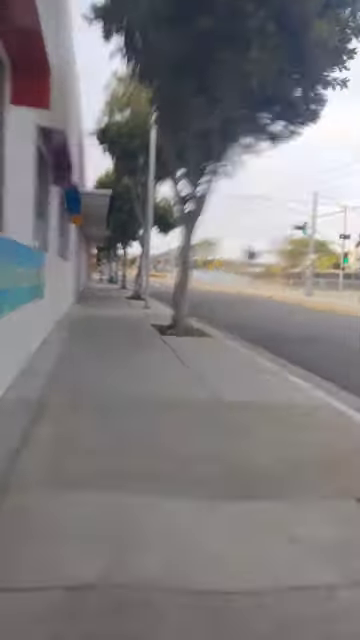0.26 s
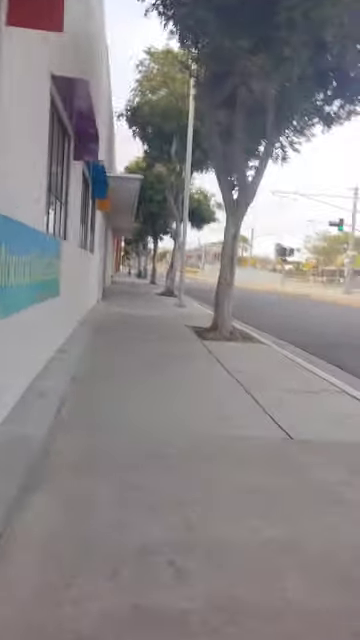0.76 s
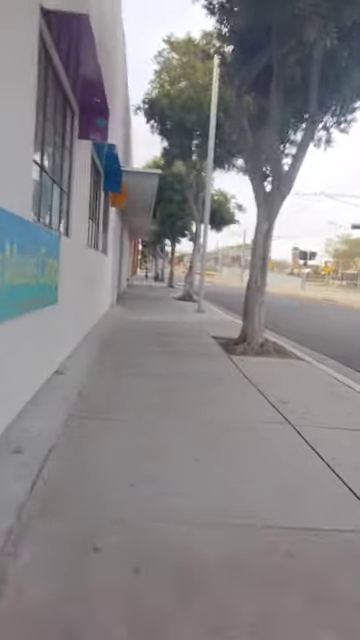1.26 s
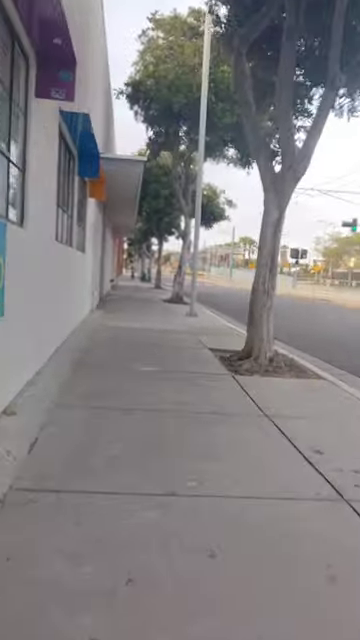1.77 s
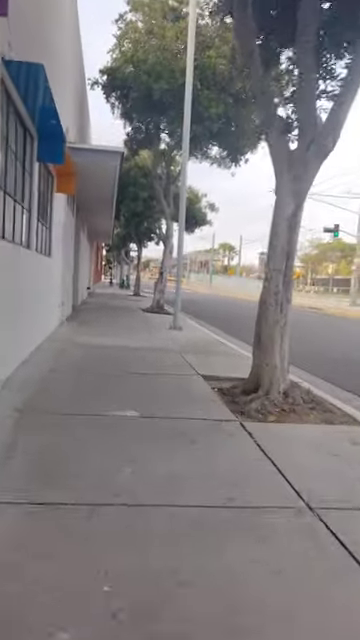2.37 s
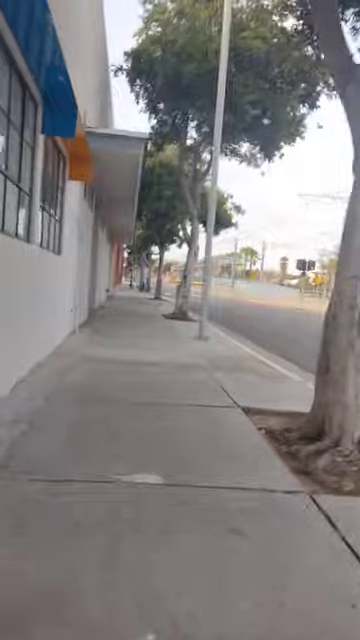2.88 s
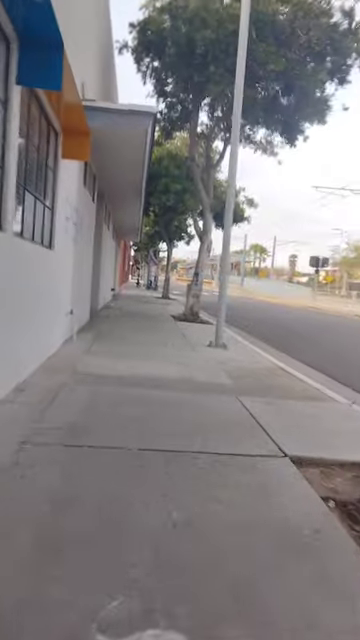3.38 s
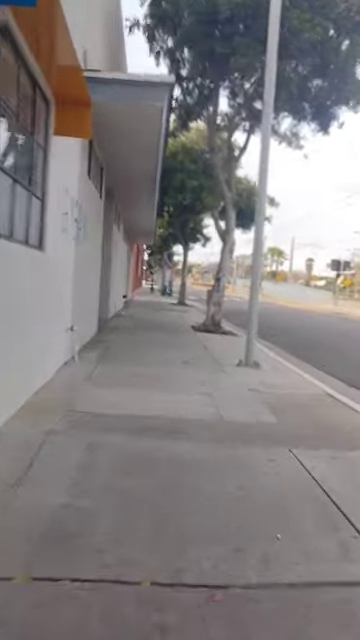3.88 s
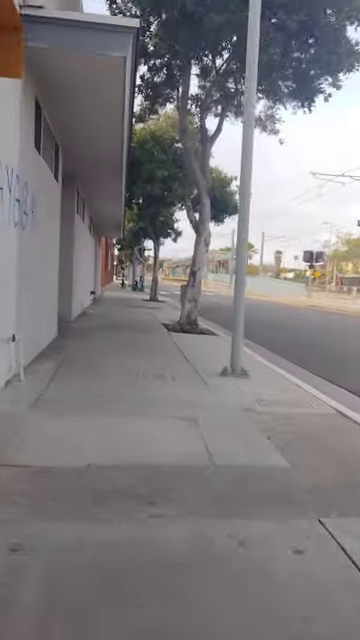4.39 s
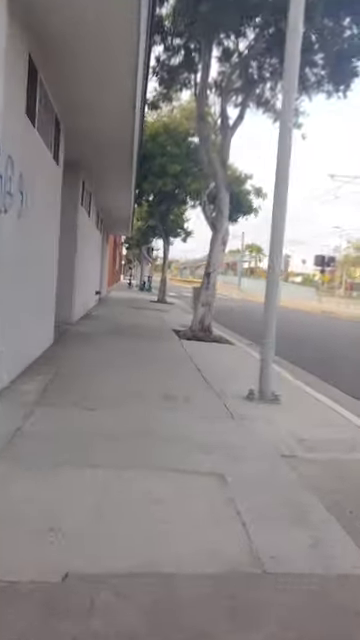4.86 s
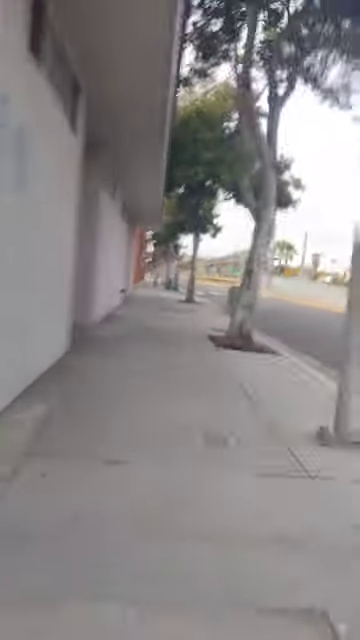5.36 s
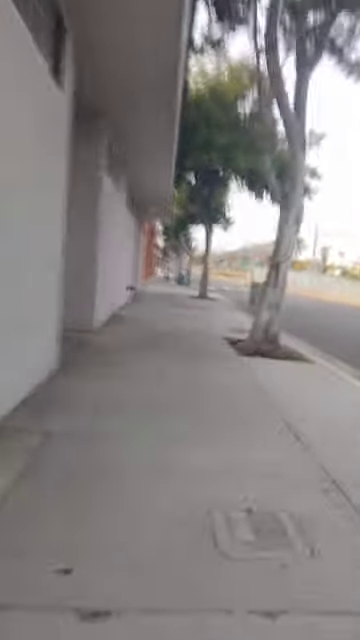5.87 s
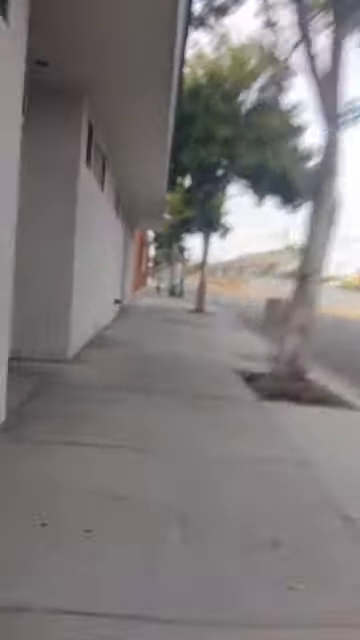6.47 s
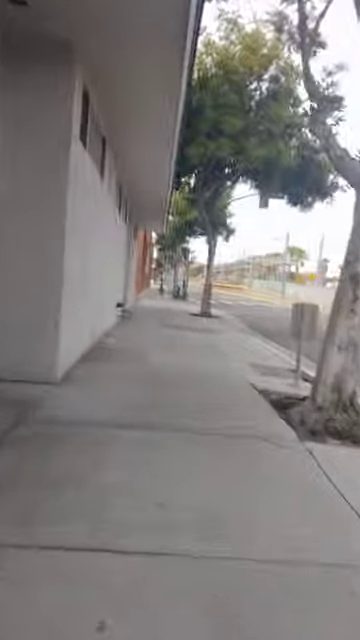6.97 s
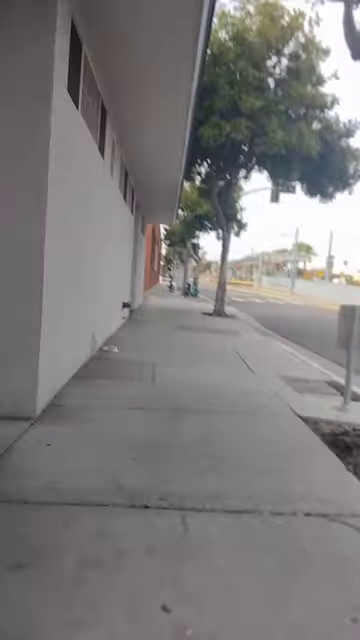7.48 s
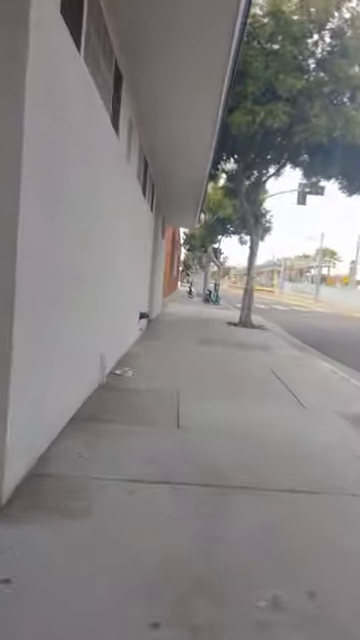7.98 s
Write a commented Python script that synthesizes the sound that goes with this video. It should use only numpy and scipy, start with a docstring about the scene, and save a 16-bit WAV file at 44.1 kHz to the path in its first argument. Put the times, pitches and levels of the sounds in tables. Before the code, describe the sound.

A stereo microphone rides on a bicycle along a concrete sidewalk beside a wall. Low tyre rumble, soft gritty hiss and slight wind run throughout. Hard casing cracks, a snap and a thump hit at 0.25 seconds, then a bright squeak at 0.3. Thin squeaks near 5.5 kilohertz repeat roughly every 0.8 seconds, leaning left, varying in strength. Buzzing clacks and scuffs come at 0.65-0.9, and the heaviest wheel thud crunches over a joint at 1.15. A hollow knock sounds at 2.2; the stretch afterward is calmer, with a clack at 3.4 and rattles and a dry tick around 4.3-4.6. Jolts and cracks cluster at 5.4-5.8. At 6.05-6.3 tyres scrub and scrape with another sharp jolt and lighter joint bump. Rattles follow, strongest at 7.36, with small bumps at 7.05 and 8.0. Faint smeared bird whistles appear near 1, 4.5, 6 and 7.6-8.2.

```python
"""Tyres rumble and hiss on concrete beside a wall: a bicycle rolls past it, the microphone riding along.
Close by, loose parts rattle, clack and scuff, and wheel and frame thud over joints: noise bursts through modes.
A dry bearing squeaks once a turn of the pedals, and chirps and scrubs glide between: wavering sines.
Wind, low thumps and jolts reach the microphone (coloured noise, swaying ports, ringing casing and mount).
Far birds are gliding whistles smeared by the street; weak echoes follow the bicycle's own close noises."""
import sys
import numpy as np
from scipy import signal
from scipy.fft import rfft, irfft
from scipy.io import wavfile

SR = 44100
rng = np.random.default_rng(int(sys.argv[2]) if len(sys.argv) > 2 else 0)


def int16_out(signal):
    """Quantize to a 16-bit WAV file."""
    q = np.round(np.clip(np.atleast_2d(signal).T, -1, 1) * 32767)
    wavfile.write(sys.argv[1], SR, q.astype(np.int16))


N = 363384

# Rolling: (time [s], tyre rumble [dB], hiss [dB])
ROLLING_LEVELS = [(0.0, -40, -46.5), (0.32, -37.5, -47), (4.15, -37.5, -51), (5.03, -37.5, -51),
                  (6.17, -36, -47.5), (6.35, -34.5, -47), (6.75, -39.5, -48), (7.14, -37, -49),
                  (8.24, -37, -48)]
# Spectra of tyre rumble, hiss, low air noise, scuffs and joint crunch: (frequency [Hz], density [dB per Hz])
TYRE_SPECTRUM = [(29, -38), (50, -4), (119, 0), (140, -6), (168, -3), (274, -10.5), (345, -10),
                 (393, -15.5), (519, -17), (564, -17.5), (1140, -24), (1360, -29), (1740, -34.5),
                 (2500, -34), (3250, -48), (5500, -120)]
HISS_SPECTRUM = [(500, 2), (1100, 4.5), (1600, 4), (2100, -0.3), (3200, 0.5), (4500, -3.5), (5500, -5.5),
                 (7000, -5.5), (8200, -17.5), (11500, -18.5), (13000, -13.5), (15700, -9), (16400, -45)]
LOW_AIR_SPECTRUM = [(12, -16), (25, -12), (42, 2), (65, -2), (110, -10), (300, -31), (900, -53)]
SCUFF_SPECTRUM = [(500, -14), (1300, -1), (2000, -1.5), (3200, -0.5), (5500, 3), (7200, -1), (9000, -9),
                  (13000, -2), (16000, -12)]
CRUNCH_SPECTRUM = [(150, 10), (400, 5), (700, -6), (1100, -3.5), (1700, -7), (3000, -12), (5500, -19),
                   (8000, -28.5), (15000, -36)]
# Likeness of the two sides: (frequency [Hz], likeness, limited to -1..1)
STEREO_LIKENESS = [(30, 0.5), (60, 0.74), (130, 1), (290, 1.8), (640, 0.07), (1400, -0.01), (15000, 0)]
# Stereo lean: (frequency [Hz], left minus right [dB])
STEREO_LEAN = [(40, -1), (130, -0.5), (500, -1), (1500, -2.5), (3300, -3.5), (4600, 2), (5700, 14.5),
               (7500, 23), (10000, 8), (15000, 0.5)]
PORT_LAG_S = 0.00031   # tyre sound reaches the left port this much later
# Fine random unevenness of the treble hiss: level against the hiss, its swing, and the most it rises
UNEVEN_DB, UNEVEN_SWING_DB, UNEVEN_TOP_DB = -11, 8, 11.5

# Gusts and low thumps on the microphone, some under jolts and joints: (time [s], level [dB], length [s])
GUSTS_AND_THUMPS = [(0.248, -25, 0.1), (0.66, -31, 0.096), (1.116, -20.5, 0.06), (5.377, -19, 0.091),
                    (5.527, -29, 0.34), (6.076, -24, 0.055), (6.21, -27, 0.062), (6.553, -29, 0.097),
                    (7.04, -24, 0.027), (7.125, -25.5, 0.13)]
WIND_DB = -41   # steady head wind

# Falling chirps between the squeaks: (time [s], length [s], start pitch [Hz], level [dB])
CHIRPS = [(0.053, 0.011, 4460, -30.5), (1.617, 0.027, 4270, -35.5), (1.666, 0.015, 1380, -36),
          (1.896, 0.024, 1660, -41), (2.378, 0.011, 4320, -32.5), (6.989, 0.011, 4290, -41)]
CHIRP_DROP, CHIRP_LEAN_DB = 0.053, 5   # share of the pitch lost; left minus right
# Tyres scrubbing sideways in a swerve: (time [s], length [s], start [Hz], end [Hz], level [dB])
TYRE_SCRUBS = [(6.056, 0.038, 1200, 1305, -43.5), (6.138, 0.04, 1590, 1776, -37),
               (6.189, 0.09, 1666, 992, -40)]
SCRUB_WAVER = 0.106   # share of the pitch

# Bright scuffs close to the microphone: (time [s], level [dB], length [s])
SCUFFS = [(0.213, -32.5, 0.012), (0.292, -29, 0.02), (0.334, -33, 0.045), (0.644, -31, 0.024),
          (0.77, -28, 0.022), (0.796, -27.5, 0.011), (0.856, -28.5, 0.011), (2.749, -42.5, 0.013),
          (3.05, -42.5, 0.025), (3.422, -40, 0.034), (3.461, -37, 0.023), (4.228, -42, 0.017),
          (5.495, -31.5, 0.014), (5.681, -37, 0.016), (5.781, -31, 0.011), (7.046, -36.5, 0.014),
          (7.334, -36.5, 0.018)]
JOINT_SCUFF_DB = -40.5   # every joint brings a faint one

# Loose parts rattling: (time [s], level [dB], left minus right [dB], loss at each bounce [dB])
RATTLES = [(0.2137, -27, -3, 20), (0.55, -27, -10, 2), (1.2907, -27.5, -11, 1), (1.585, -37, -5, 15),
           (2.1074, -33.5, -6, 25), (2.278, -36.5, -10, 7), (3.046, -30, -9, 6), (3.593, -33, -10, 12),
            (4.371, -35, -3, 9), (4.542, -31, -4, 14), (4.5709, -25.5, -8, 19), (5.978, -37.5, -7, 16),
           (6.3118, -32.5, -9, 17), (6.609, -24.5, -8, 15), (6.6746, -27.5, -8, 22), (6.827, -31, -4, 7),
           (7.335, -35, 0, 15), (7.3607, -17, -6, 29), (7.4082, -29.5, -5, 19), (7.568, -36, -8, 0.5),
           (8.126, -23, 1, 16)]
# Modes of the loose fittings: (frequency [Hz], level [dB], t60 [s])
FITTING_MODES = [(1190, -5, 0.016), (1750, -5.5, 0.012), (2370, -6, 0.012), (3030, 0, 0.031),
                 (3366, -0.5, 0.025), (3720, 1, 0.0096), (4190, -7, 0.021), (4576, -2.5, 0.03)]
BOUNCE_S, CHATTER_T60_S = 0.014, 0.042
KNOCK_S, KNOCK_DB = 2.197, -20.5   # one hollow knock, before its lift in the mix
# Modes of the hollow knock: (frequency [Hz], level [dB], t60 [s])
HOLLOW_MODES = [(602, 2, 0.056), (980, -11, .035), (1350, -9, .03), (1870, -11, .04)]

# Tyres over joints: (time [s], thud level [dB], grit level [dB], pitch favoured by the blow [Hz])
JOINTS = [(1.144, -2, -21.5, 185), (6.241, -16.5, -33.5, 260), (7.054, -13, -29, 370),
          (8.001, -15, -28.5, 280)]
# Modes of wheel and frame: (frequency [Hz], level [dB], t60 [s])
FRAME_MODES = [(159, 0, 0.047), (215.6, 3, 0.052), (347, -4.5, 0.052), (480, -1, 0.03), (584, -2, 0.033),
               (742, -6, 0.044), (1110, -6, 0.024)]
# The wheel meets the edge, lands and hops three times: (delay [s], level [dB])
WHEEL_HOPS = [(-0.004, -5), (0.003, 1), (.021, -12), (.033, -6), (.06, -7)]
SHUDDER_T60_S = 0.11
CRUNCH_LEAD_S, CRUNCH_S = 0.0091, 0.032
# Tyres scraping over grit: (time [s], level [dB], length [s])
GRIT_SCRAPES = [(0.246, -22, 0.029), (1.129, -26.5, 0.039), (3.411, -31.5, 0.022), (5.373, -30, 0.029),
                (6.048, -38.5, 0.063), (6.118, -37, 0.074), (6.192, -24.5, 0.035)]

# Bearing squeaks: (time [s], level [dB], length [s], climbing tone [dB], left minus right [dB])
SQUEAKS = [(0.325, -16.5, 0.056, -20, 7), (1.245, -32, 0.042, 6.5, 14), (2.003, -23.5, 0.057, -7, 10),
           (2.774, -41.5, 0.029, 3.5, 12), (3.54, -34, 0.043, 2, 12), (4.313, -30, 0.044, -0.5, 14),
           (5.098, -32, 0.048, -4, 12), (5.865, -24.5, 0.042, -4, 8), (6.484, -28.5, 0.05, -3.5, 13),
           (7.369, -27.5, 0.039, 2.5, 15), (8.141, -35.5, 0.056, 0.5, 12)]
SQUEAK_HZ, CLIMB_FROM_HZ, CLIMB_TO_HZ = 5534, 5520, 5710
SQUEAK_RING_T60_S = 0.25
LEAD_IN_S, LEAD_IN_HZ, LEAD_IN_DB = 0.065, 5340, -51   # a faint whine comes before each squeak
# Faint steady whines around the squeaks: (time [s], length [s], pitch [Hz], level [dB])
WHINES = [(0.423, 0.032, 5440, -44), (0.475, 0.036, 5500, -43.5), (3.43, 0.025, 5470, -41),
          (3.29, 0.055, 5500, -50), (4.184, 0.036, 5450, -51.5), (4.277, 0.018, 10140, -46.5),
          (5.065, 0.067, 4850, -50), (7.435, 0.04, 5500, -45), (7.966, 0.02, 5400, -37),
          (8.028, 0.025, 5530, -43)]
WHINE_LEAN_DB = 19

# Bright snaps of the mount: (time [s], level [dB])
SNAPS = [(0.2604, -25), (0.2638, -15), (5.3858, -22.5), (5.4054, -30), (5.437, -27), (5.495, -25),
         (5.6758, -22), (5.7747, -26), (5.7786, -26), (5.7876, -30), (6.2125, -14), (6.269, -35),
         (7.057, -36), (7.0669, -26), (7.2122, -31)]
SNAP_HOLD_S, SNAP_T60_S = 0.00057, 0.0055
# Colour of the snaps: (frequency [Hz], density [dB per Hz])
SNAP_SPECTRUM = [(1500, -14), (5500, 3), (9500, -2), (15000, 3.5)]

# Jolts of the microphone: (time [s], sway level [dB], knock level [dB])
JOLTS = [(0.261, -5.5, -12), (5.384, -7, -8.5), (5.431, -9, -28), (5.483, -17, -20.5), (5.669, -13, -21),
         (5.773, -14, -24), (6.089, -13.5, -24), (6.208, -5.5, -9.5)]
# Sway at the left, then the right port: (delay [s], frequency [Hz], t60 [s])
PORT_SWAY = [(0.002, 112, 0.043), (0.0045, 68, 0.041)]
# Modes of the knocked mount: (frequency [Hz], level [dB], t60 [s])
MOUNT_MODES = [(165, 2.5, 0.024), (345, -2.5, 0.028), (502, -4.5, 0.038), (1080, -14, 0.02)]
# Hard cracks of the microphone casing: (time [s], peak [dB])
CASING_CRACKS = [(0.2604, -10), (0.2661, -8.5), (5.389, -9.5), (5.4298, -19.5), (5.4857, -21),
                 (5.4924, -21.5), (6.217, -14)]
CRACK_LEAN_DB = -27
# Modes of the casing: (frequency [Hz], level [dB], t60 [s])
CASING_MODES = [(1155, -2.5, 0.014), (1670, 1.5, 0.0081), (2340, -1.5, 0.012), (3000, -3, 0.007),
                (3820, 0.5, 0.0036)]

# Buzzing clacks: (time [s], level [dB], length [s], pitch favoured [Hz], left minus right [dB])
CLACKS = [(0.647, -20.5, 0.0088, 2520, -9), (0.656, -14.5, 0.0075, 3000, -4), (0.79, -25, 0.014, 1100, -14),
          (0.864, -27.5, 0.013, 1100, -7), (3.416, -18.5, 0.0046, 1710, -11),
          (3.426, -22, 0.0094, 2880, -3), (6.166, -29, 0.0078, 1900, 0), (7.993, -21.5, 0.0041, 1300, -1)]
CLACK_FOCUS_DB = 12.5   # loss per octave away from that pitch
# Modes of the bracket that clacks: (frequency [Hz], level [dB], t60 [s])
BRACKET_MODES = [(1310, -3, 0.026), (1800, -9, 0.005), (2170, -0.5, 0.01), (2510, -1.5, 0.011),
                 (2993, -0.5, 0.024), (3635, 1.5, 0.018)]
TICK_S, TICK_DB, TICK_LEAN_DB = 4.3262, -21, 12   # one dry tick on the left
# Modes of the tick: (frequency [Hz], level [dB], t60 [s])
TICK_MODES = [(4060, -2, 0.0085), (4500, 5, 0.0087)]

# Far birds: (time [s], length [s], start pitch [Hz], end pitch [Hz], level [dB])
BIRDS = [(0.997, 0.037, 2950, 3080, -39), (4.5, 0.022, 5100, 3950, -38), (4.591, 0.078, 2745, 2390, -38.5),
         (4.613, 0.057, 4800, 4320, -48), (6.028, 0.063, 3110, 2950, -44), (7.645, 0.035, 2110, 2230, -41),
         (7.691, 0.023, 2520, 2770, -37.5), (7.714, 0.079, 4330, 3310, -38),
         (7.934, 0.046, 4850, 4460, -37), (8.148, 0.088, 4360, 3200, -39.5)]
BIRD_FADE_T60_S, STREET_T60_S = 0.35, 0.19
CUTOFF_HZ = 16500


def from_db(db):
    """Decibels as an amplitude factor."""
    return 10 ** (np.asarray(db) / 20)


def rms_one(x):
    """Scaled to unit power."""
    return x / np.sqrt(np.mean(x ** 2) + 1e-20)


def in_time(rows):
    """Curve columns at every sample."""
    s, *columns = np.transpose(rows)
    return [np.interp(np.arange(N) / SR, s, column) for column in columns]


def at_hz(points, hz):
    """A table read along log frequency."""
    table_hz, values = np.array(points).T
    return np.interp(np.log(hz + 1e-6), np.log(table_hz), values)


def panned(lean_db):
    """Left and right gains of constant power; a positive lean is to the left."""
    gains = np.vstack([from_db(lean_db / 2), from_db(-lean_db / 2)])
    return gains / np.sqrt(np.mean(gains ** 2, axis=0))


def drift(rate, size=N):
    """Straight lines between random knots of spread 1, rate knots for every SR points."""
    knots = rng.standard_normal(int(size / SR * rate) + 3)
    return np.interp(np.arange(size) / SR * rate, np.arange(len(knots)), knots)


def noise(spectrum, lean=0.92, shared=1.0, ripple_db=-4.0):
    """Coloured stereo noise of rms 1, its likeness set by frequency, rippled by nearby surfaces."""
    hz = np.arange(N // 2 + 1) * SR / N
    mid, side = rfft(rng.standard_normal((2, N)))
    alike = np.clip(shared * at_hz(STEREO_LIKENESS, hz), -1, 1)
    pair = np.sqrt(1 + alike) * mid + np.sqrt(1 - alike) * side * [[1], [-1]]
    # The ripple runs along frequency and is full from 2 kHz up.
    ripple = ripple_db * drift(49.65, size=len(hz)) * np.minimum(hz / 2000, 1)
    colour = from_db(at_hz(spectrum, hz) + ripple) * (hz > 10)
    return rms_one(irfft(pair * colour * panned(lean * at_hz(STEREO_LEAN, hz)), N))


def ring(force, modes):
    """Each mode rings as a dying sine; neighbours swing in opposite directions."""
    out = 0
    for k, (hz, db, t60) in enumerate(modes):
        radius = from_db(-60 / (t60 * SR))
        angle = 2 * np.pi * hz / SR
        poles = [1, -2 * radius * np.cos(angle), radius * radius]
        swing = signal.lfilter([0, np.sin(angle)], poles, force + 1e-18)
        out = out + (-1) ** k * from_db(db) * swing
    return out


def add(track, s, sound):
    """Mixes a sound in at time s."""
    start = max(round(s * SR), 0)
    part = sound[..., :max(N - start, 0)]
    track[..., start:start + part.shape[-1]] += part


def burst(rise, hold, t60, size=16000):
    """An envelope that swells, holds and dies away."""
    t = np.arange(size) / SR
    fall = np.exp(-np.log(1000) * np.maximum(t - hold, 0) / t60)
    return (1 - np.exp(-t / rise)) * fall


def rub(length):
    """An envelope that swells and falls away over about the given length."""
    t = np.arange(round(4 * length * SR)) / SR / length
    body = (1 - np.exp(-(4 * t) ** 2)) * np.exp(-t ** 4 / 2)
    return body + 0.2 * t * np.exp(-t ** 2 / 2)


def blow(modes, t60, chatter, swell=0.000075):
    """One contact and its dying chatter of small ones, rung through a body; peak 1."""
    envelope = burst(swell, 0, t60)
    force = chatter * envelope * rng.standard_normal(len(envelope))
    force[0] += 1
    sound = ring(force, modes)
    return sound / np.max(np.abs(sound))


def whistle(start_hz, end_hz, length, waver, t60=0.028, bend=1):
    """A gliding tone, unsteady in pitch and strength, that fades once it is no longer driven."""
    envelope = burst(0.0018, length, t60) * burst(0.0018, length, np.inf)
    size = len(envelope)
    progress = np.minimum(np.arange(size) / SR / length, 1)
    hz = start_hz + (end_hz - start_hz) * progress ** bend
    hz = hz * (1 + waver * drift(497, size=size))
    strength = from_db(3.5 * drift(96.0, size=size))
    return envelope * strength * np.sin(2 * np.pi * np.cumsum(hz) / SR)


def rolling():
    """Tyres rumble and hiss on uneven concrete; grit ticks in loose clusters; the treble hiss is uneven."""
    tyre_db, hiss_db = in_time(ROLLING_LEVELS)
    tyres = from_db(tyre_db + 3.0 + 1.22 * drift(25)) * noise(TYRE_SPECTRUM, ripple_db=3.0)
    tyres[0] = np.interp(np.arange(N) - PORT_LAG_S * SR, np.arange(N), tyres[0])
    hiss_level = from_db(hiss_db + 2.5 + 2.83 * drift(40) + 1.7 * drift(600))
    hiss = hiss_level * noise(HISS_SPECTRUM, ripple_db=2.0)
    # Chance hits around 90 a second on each side, thickening and thinning together.
    hits = rng.random((2, N)) < 90 * from_db(6 * drift(9)) / SR
    grains = hits * np.minimum(rng.exponential(1, (2, N)), 3)
    grit = ring(grains * from_db(hiss_db - 5.0), FITTING_MODES) * panned(-8)
    uneven_swing_db = np.minimum(UNEVEN_SWING_DB * drift(260), UNEVEN_TOP_DB)
    uneven_treble = from_db(hiss_db + UNEVEN_DB + uneven_swing_db) * noise(SCUFF_SPECTRUM)
    return tyres + hiss + grit + uneven_treble


def wind_and_thumps():
    """Air tumbles steadily over the microphone; gusts and low thumps differ almost wholly between ports."""
    swells = np.zeros(N)
    for s, db, length in GUSTS_AND_THUMPS:
        add(swells, s, from_db(db) * rub(length))
    steady = from_db(WIND_DB) * noise(LOW_AIR_SPECTRUM, shared=0.99)
    return steady + swells * noise(LOW_AIR_SPECTRUM, shared=-0.087) * panned(-5)


def chirps():
    """Short thin chirps sag in pitch; the tyres scrub with a rough, gliding note."""
    out = np.zeros((2, N))
    for s, length, hz, db in CHIRPS:
        chirp = whistle(hz, hz * (1 - CHIRP_DROP), length, waver=0.018, t60=0.036)
        add(out, s, from_db(db) * panned(CHIRP_LEAN_DB) * chirp)
    for s, length, start_hz, end_hz, db in TYRE_SCRUBS:
        pair = np.array([whistle(start_hz, end_hz, length, waver=SCRUB_WAVER) for side in range(2)])
        add(out, s, from_db(db) * panned(-2.9) * pair)
    return out


def wall(x):
    """A few weak echoes from wall, awning and ground, different for each side."""
    out = np.zeros((2, N))
    for k, delay in enumerate([0.0093, 0.0127, 0.0211, 0.0283]):
        side = k % 2
        add(out[side], delay, from_db(-12.0 - 135 * delay) * x[side])
    return out


def scuffs():
    """Grainy rubs close to the microphone, alone or with a jolt or joint."""
    pressure = np.zeros(N)
    for s, db, length in SCUFFS:
        add(pressure, s, from_db(db) * rub(length))
    for s, *_ in JOINTS:
        add(pressure, s - CRUNCH_LEAD_S, from_db(JOINT_SCUFF_DB) * rub(CRUNCH_S))
    grain = from_db(2.9 * drift(700) - 2.0)
    return pressure * grain * noise(SCUFF_SPECTRUM, lean=0.79, ripple_db=4.0)


def rattle(loss_db, count=3):
    """A loose fitting clicks, chatters and bounces, weaker each time; stereo."""
    out = np.zeros((2, SR))
    for k in range(count):
        pair = []
        for side in range(2):
            click = blow(FITTING_MODES, 0.0094, chatter=1.36, swell=0.00088)
            chatter = blow(FITTING_MODES, CHATTER_T60_S, chatter=1.8, swell=0.009)
            pair.append(click + 0.5 * chatter)
        add(out, k * BOUNCE_S * rng.uniform(0.85, 1.15), from_db(-k * loss_db) * np.array(pair))
    return out


def rattles():
    """Loose fittings rattle on bumps; something hollow knocks once."""
    out = np.zeros((2, N))
    for s, db, lean_db, loss_db in RATTLES:
        add(out, s, from_db(db + 3.5) * panned(lean_db) * rattle(loss_db))
    add(out, KNOCK_S, from_db(KNOCK_DB + 2.5) * blow(HOLLOW_MODES, 0.015, chatter=0.02))
    return out


def joints():
    """A wheel crunches over a joint, drops and hops: the frame shudders, higher for a sharper edge."""
    thuds, crunch = np.zeros((2, N)), np.zeros(N)
    for s, db, grit_db, blow_hz in JOINTS:
        # Modes lose 5.4 dB per octave away from the pitch of the blow.
        modes = [(hz, mode_db - 5.4 * abs(np.log2(hz / blow_hz)), t60) for hz, mode_db, t60 in FRAME_MODES]
        add(crunch, s - CRUNCH_LEAD_S, from_db(grit_db) * rub(CRUNCH_S))
        for delay, hop_db in WHEEL_HOPS:
            shared = blow(modes, SHUDDER_T60_S, chatter=0.0087)
            for side, lag in enumerate([PORT_LAG_S, 0]):
                own = blow(modes, SHUDDER_T60_S, chatter=0.38)
                add(thuds[side], s + delay + lag, from_db(db + hop_db - 1.5) * (shared + 0.45 * own))
            grit_level = from_db(grit_db + 0.99 * hop_db - 4.0)
            add(crunch, s + delay, grit_level * burst(0.0082, 0.0036, 0.21))
    for s, db, length in GRIT_SCRAPES:
        add(crunch, s, from_db(db) * rub(length))
    return thuds * panned(-2.2) + crunch * noise(CRUNCH_SPECTRUM, ripple_db=0.5)


def squeaks():
    """The bearing whines faintly, then sings on one wavering pitch while a second tone climbs away from it."""
    out = np.zeros((2, N))
    for s, db, length, climb_db, lean_db in SQUEAKS:
        slip = whistle(CLIMB_FROM_HZ, CLIMB_TO_HZ, length, waver=0.005, t60=0.048)
        metal = whistle(SQUEAK_HZ, SQUEAK_HZ, length, waver=0.006, t60=0.69)
        metal = metal * burst(0.0022, 0.014, SQUEAK_RING_T60_S)
        squeak = (from_db(climb_db) * slip + metal) * burst(0.0031, length, np.inf)
        add(out, s, from_db(db - 8.0) * panned(lean_db) * squeak)
        lead_in = whistle(LEAD_IN_HZ, LEAD_IN_HZ, LEAD_IN_S / 2, waver=0.011)
        add(out, s - LEAD_IN_S, from_db(LEAD_IN_DB) * panned(WHINE_LEAN_DB) * lead_in)
    for s, length, hz, db in WHINES:
        add(out, s, from_db(db) * panned(WHINE_LEAN_DB) * whistle(hz, hz, length, waver=0.0091))
    return out


def snaps():
    """The mount sticks and lets go in single bright snaps, a few milliseconds long, mostly on the left."""
    slips = np.zeros(N)
    for s, db in SNAPS:
        add(slips, s, from_db(db) * burst(0.0001, SNAP_HOLD_S, SNAP_T60_S))
    return slips * noise(SNAP_SPECTRUM, lean=0, ripple_db=-2) * panned(12.0)


def jolts():
    """A jolt knocks the mount and sets each port swaying; the casing cracks on the right."""
    out = np.zeros((2, N))
    for s, sway_db, knock_db in JOLTS:
        add(out, s, from_db(knock_db) * panned(-15.0) * blow(MOUNT_MODES, 0.036, chatter=0.031))
        for side, (delay, hz, t60) in enumerate(PORT_SWAY):
            sway = blow([(hz, 0, t60)], t60, chatter=0.0086)
            add(out[side], s + delay, -from_db(sway_db) * sway)
    for s, db in CASING_CRACKS:
        add(out, s, from_db(db) * panned(CRACK_LEAN_DB) * blow(CASING_MODES, 0.0069, chatter=0.48))
    return out


def clacks():
    """A stiffer part buzzes against the frame for a moment; where it touches decides which modes ring."""
    out = np.zeros((2, N))
    for s, db, length, focus_hz, lean_db in CLACKS:
        modes = []
        for hz, mode_db, t60 in BRACKET_MODES:
            modes.append((hz, mode_db - CLACK_FOCUS_DB * abs(np.log2(hz / focus_hz)), t60))
        envelope = burst(0.0012, length, 0.012)
        size = len(envelope)
        touches = envelope * from_db(4.9 * drift(890, size=size)) * rng.standard_normal((2, size))
        # The second noise enters the two sides in opposite sense, widening the buzz.
        pair = ring(touches[0] + 0.69 * touches[1] * [[1], [-1]], modes)
        add(out, s, from_db(db) * panned(lean_db) * pair / np.max(np.abs(pair)))
    add(out, TICK_S, from_db(TICK_DB) * panned(TICK_LEAN_DB) * blow(TICK_MODES, 0.004, chatter=0.05))
    return out


def birds():
    """Far whistles glide ever faster as they fade, and reach each side smeared by the street."""
    out = np.zeros((2, N))
    tail = burst(0.00092, 0, STREET_T60_S)
    for s, length, start_hz, end_hz, db in BIRDS:
        call = whistle(start_hz, end_hz, length, waver=0.027, t60=0.02, bend=1.8)
        call = call * burst(0.0046, length / 2, BIRD_FADE_T60_S)
        echoes = tail * rng.standard_normal((2, len(tail))) / np.sqrt(np.sum(tail ** 2))
        add(out, s, from_db(db) * signal.fftconvolve(echoes, call[None], axes=1))
    return out


def scene():
    """The bicycle's own noises and their echoes over rumble, wind and far birds."""
    bicycle = chirps() + scuffs() + rattles() + joints() + squeaks() + clacks()
    microphone = wind_and_thumps() + snaps() + jolts()
    return rolling() + microphone + birds() + bicycle + wall(bicycle)


def record(dry):
    """Peaks are rounded, then the top is cut steeply."""
    top_cut = signal.ellip(10, 0.2, 80, CUTOFF_HZ, fs=SR, output="sos")
    return signal.sosfilt(top_cut, np.tanh(dry))


dry = scene()
out = record(dry)
int16_out(out)
```